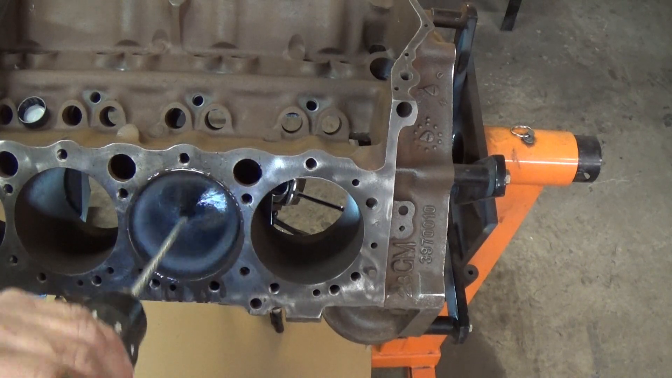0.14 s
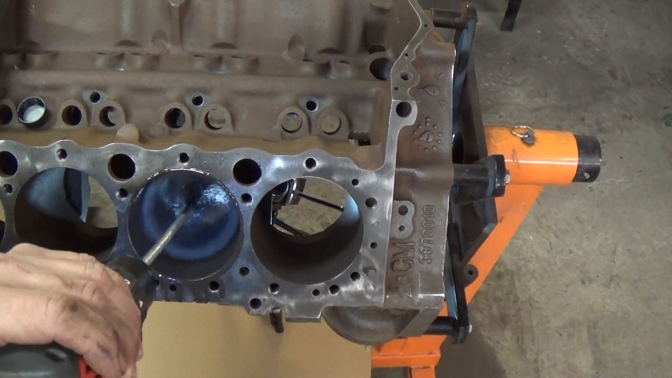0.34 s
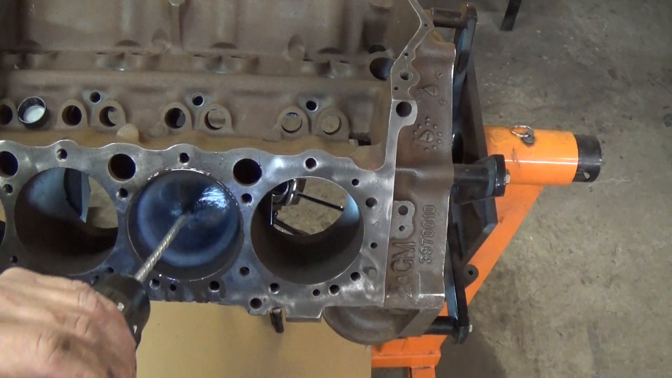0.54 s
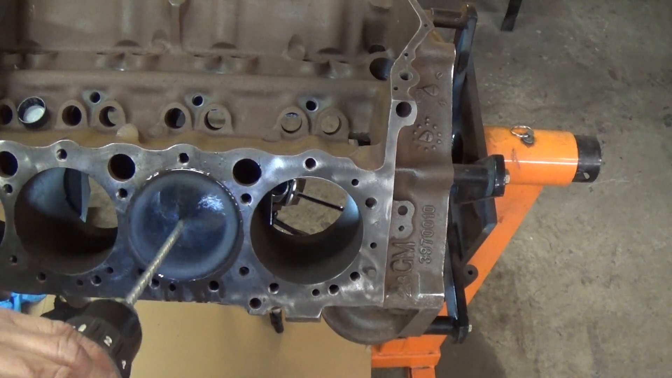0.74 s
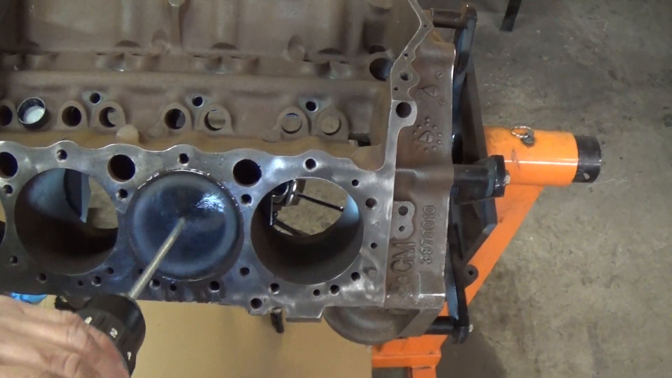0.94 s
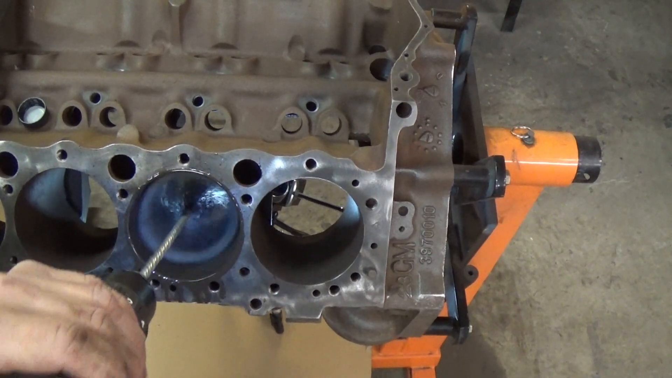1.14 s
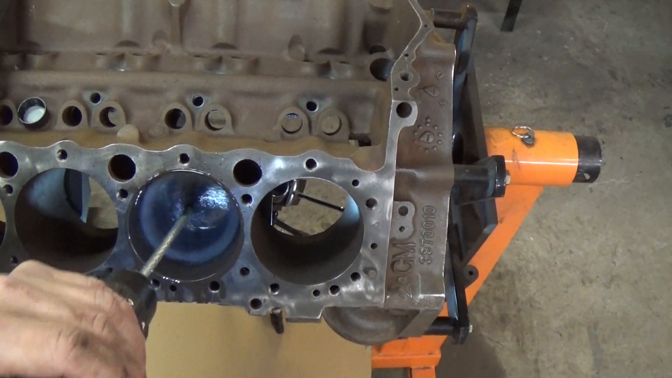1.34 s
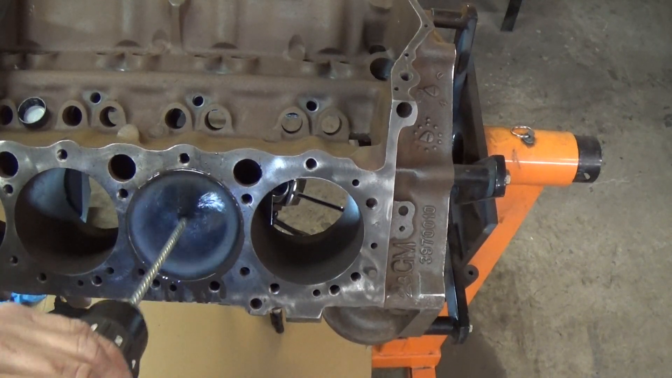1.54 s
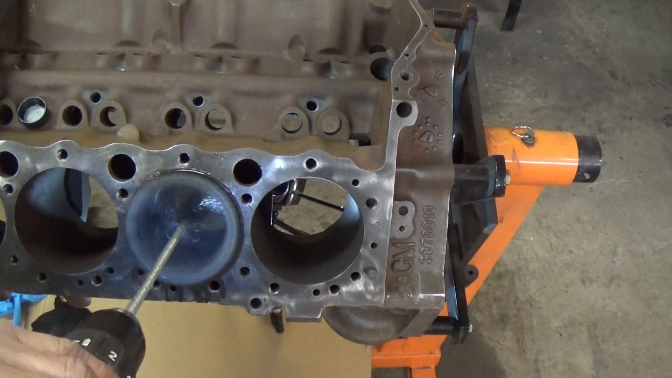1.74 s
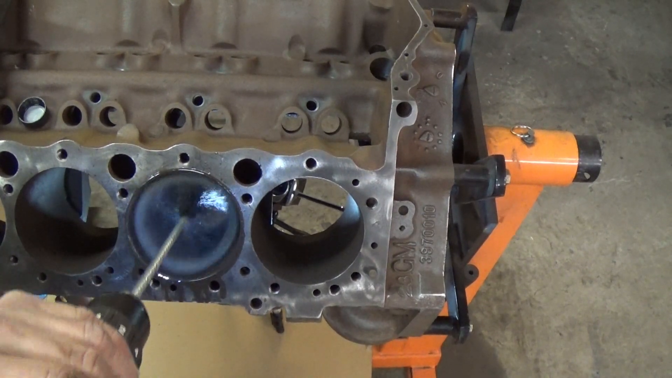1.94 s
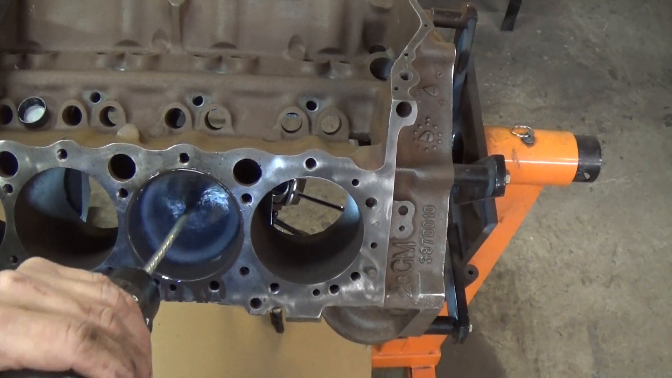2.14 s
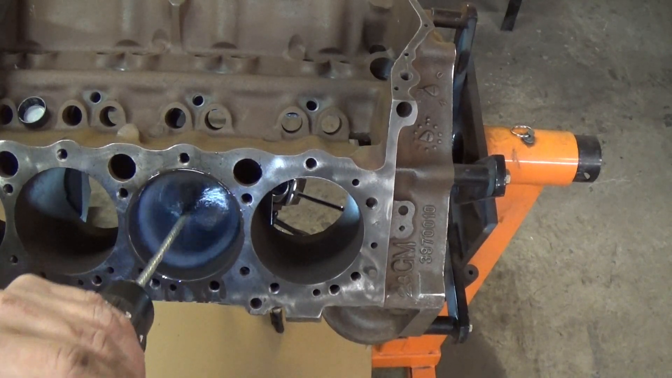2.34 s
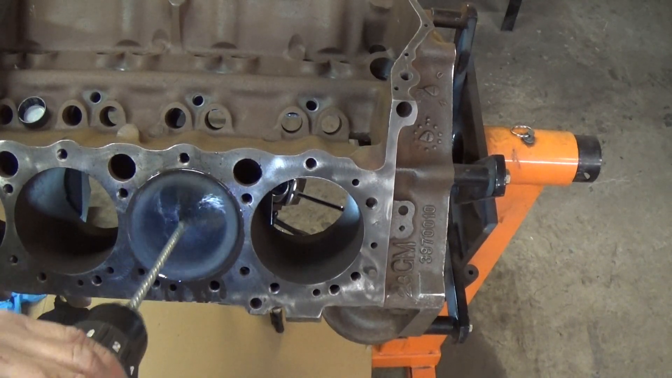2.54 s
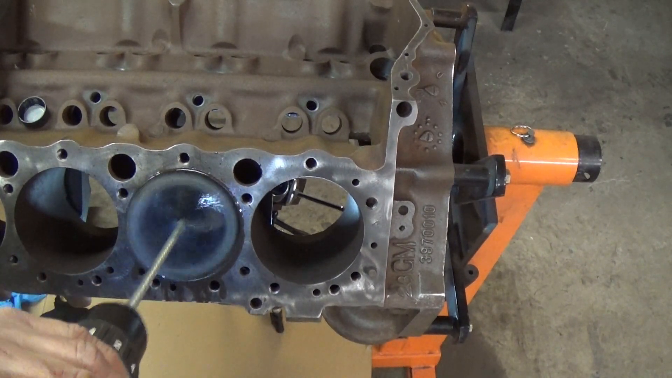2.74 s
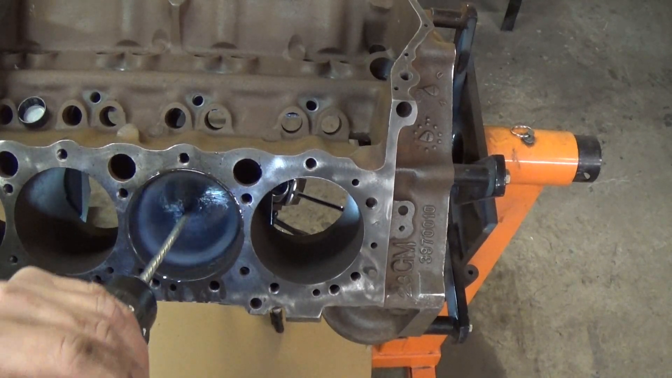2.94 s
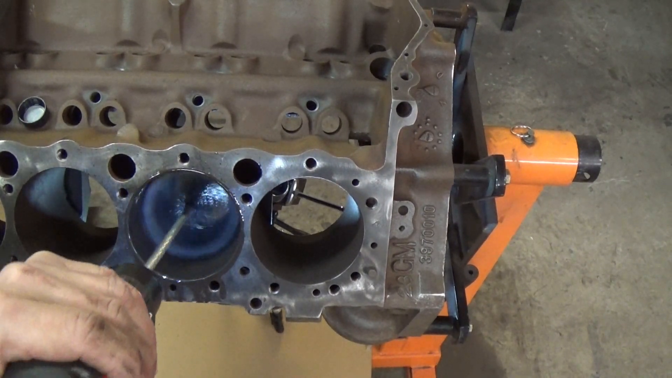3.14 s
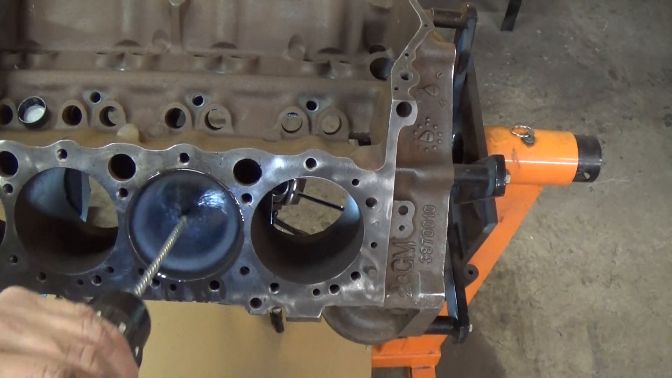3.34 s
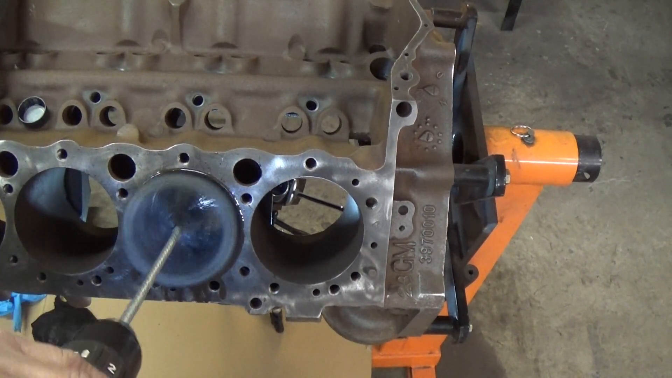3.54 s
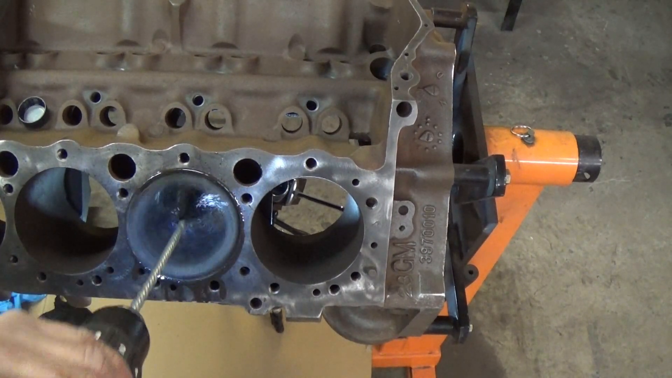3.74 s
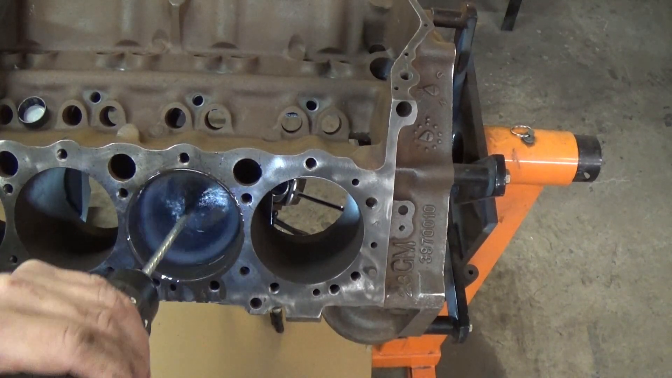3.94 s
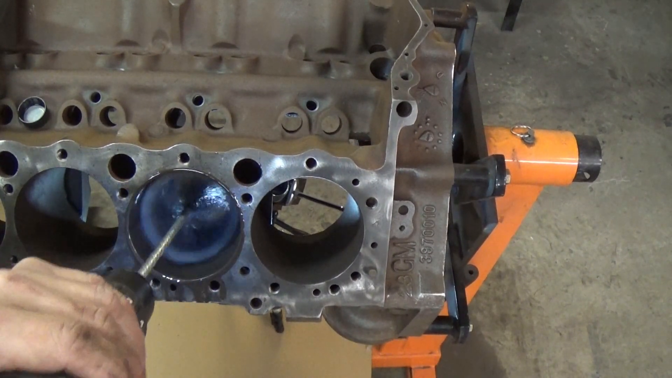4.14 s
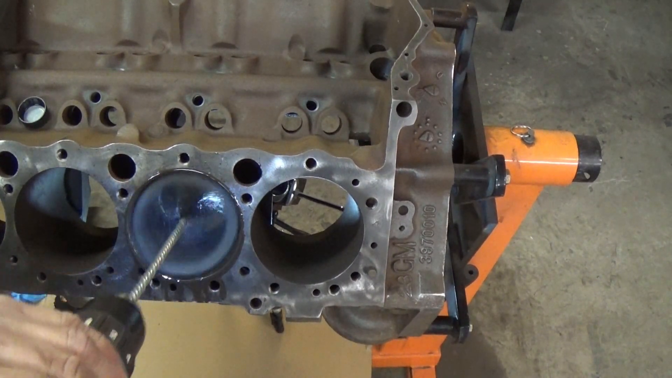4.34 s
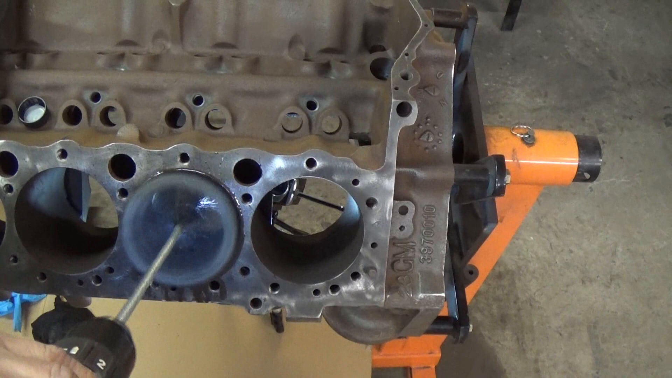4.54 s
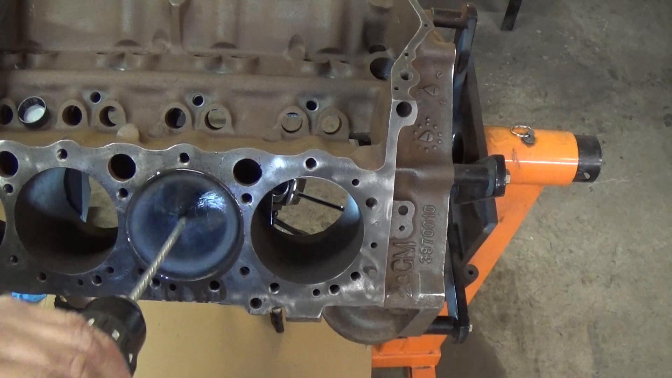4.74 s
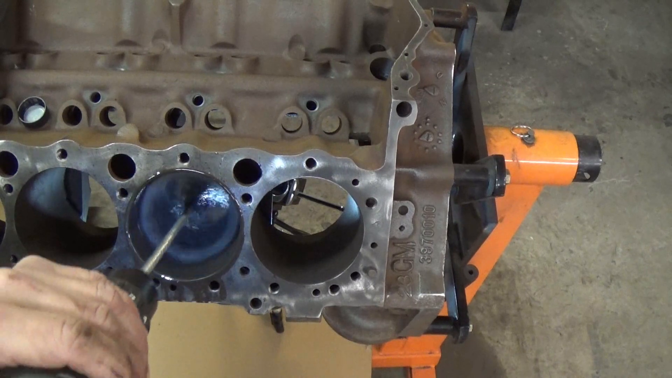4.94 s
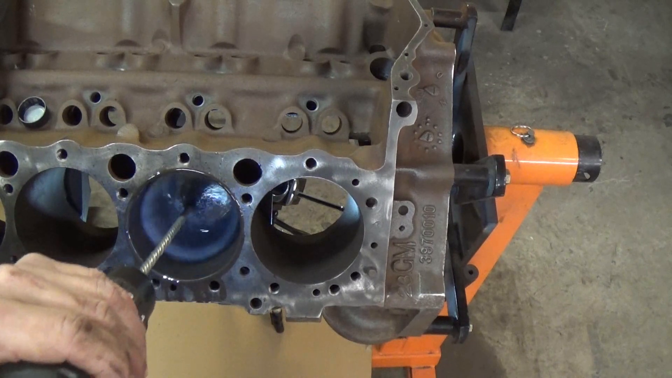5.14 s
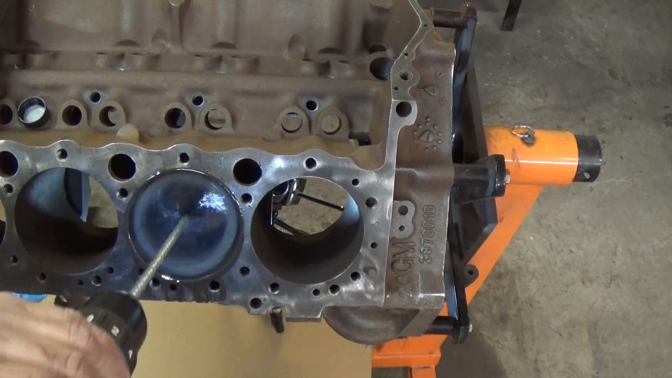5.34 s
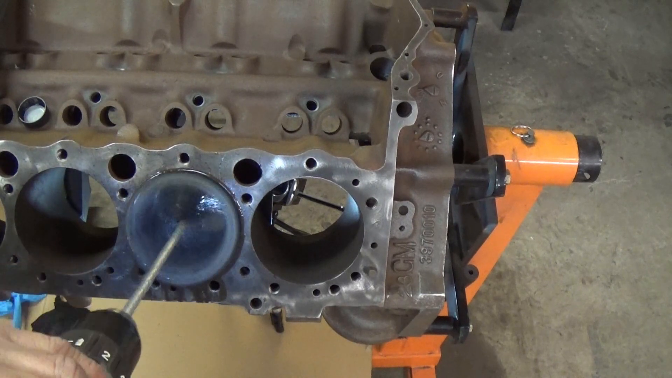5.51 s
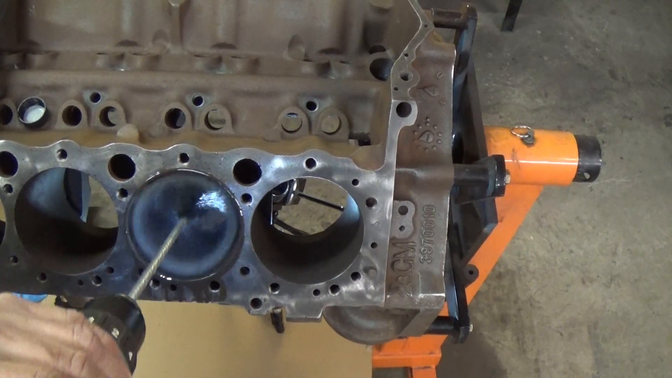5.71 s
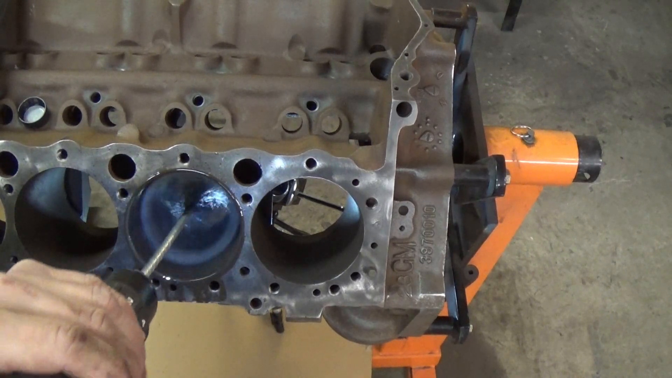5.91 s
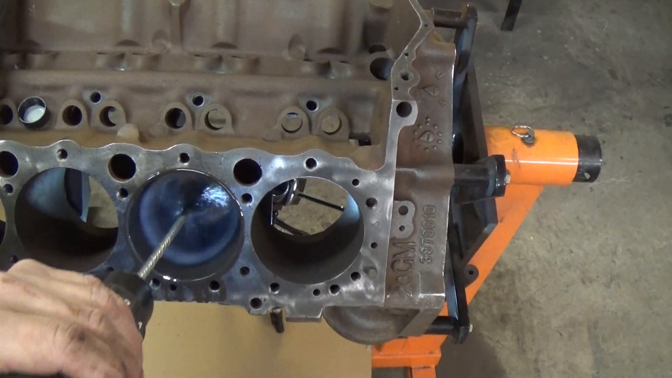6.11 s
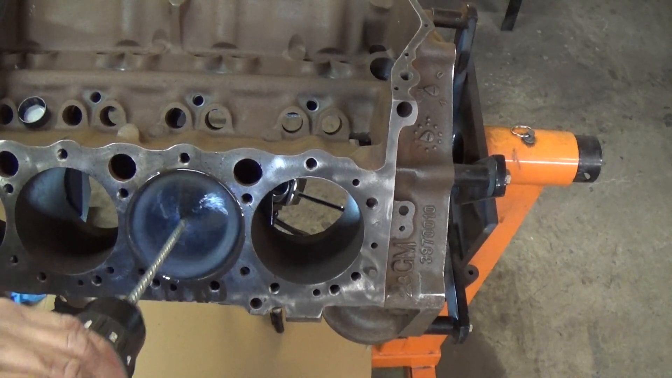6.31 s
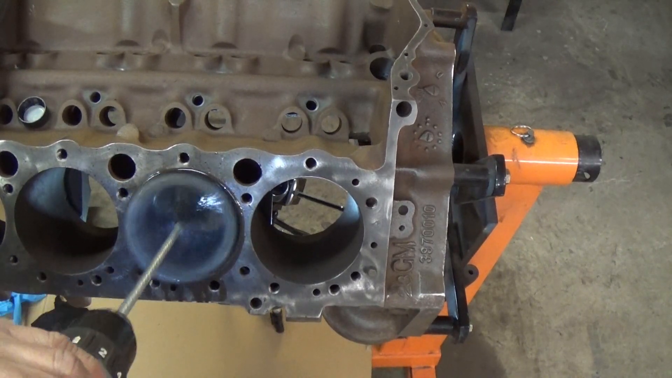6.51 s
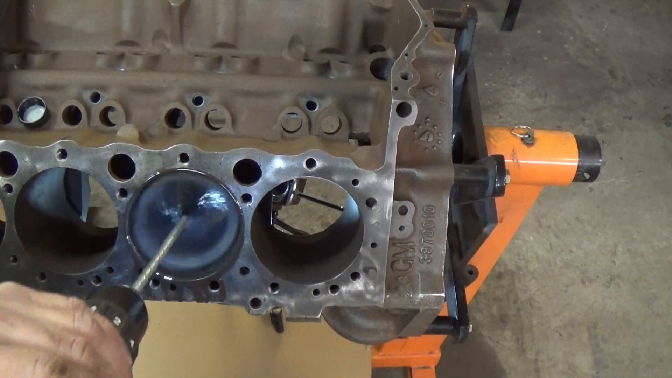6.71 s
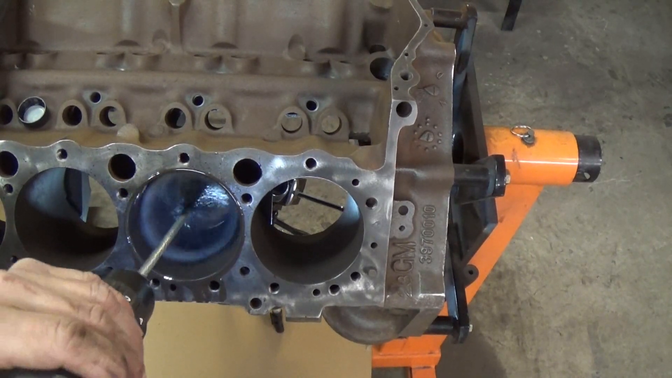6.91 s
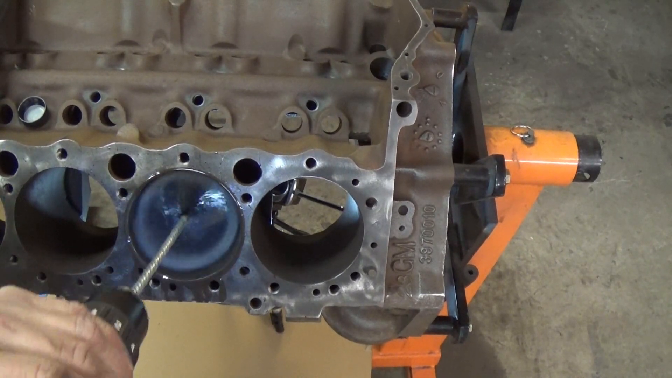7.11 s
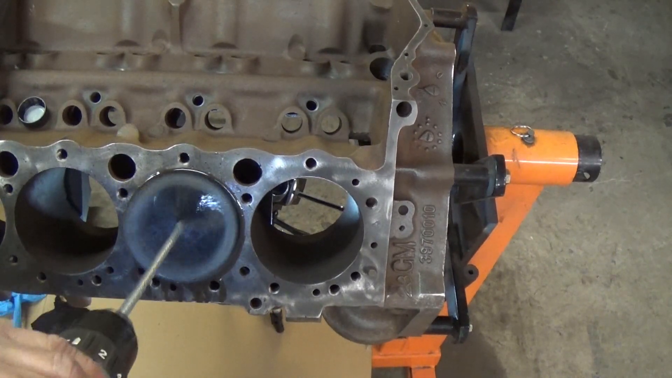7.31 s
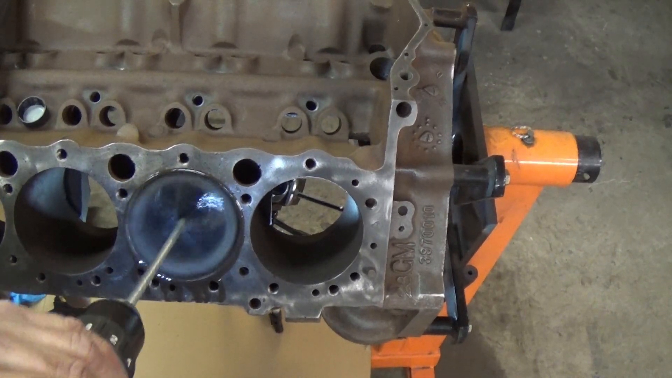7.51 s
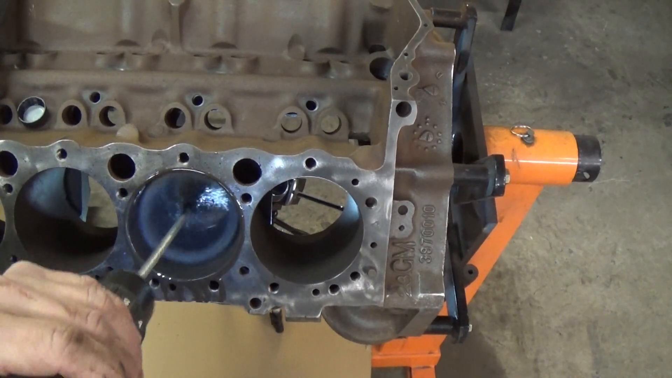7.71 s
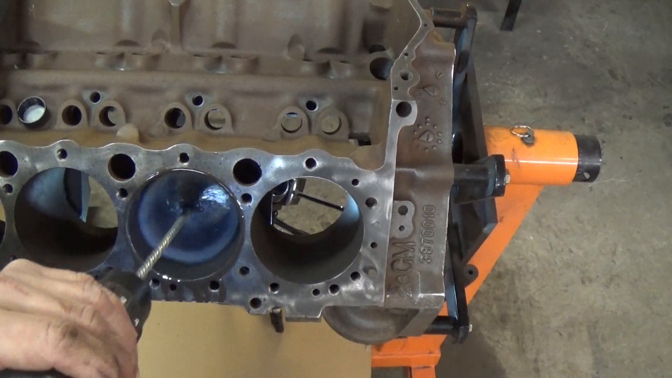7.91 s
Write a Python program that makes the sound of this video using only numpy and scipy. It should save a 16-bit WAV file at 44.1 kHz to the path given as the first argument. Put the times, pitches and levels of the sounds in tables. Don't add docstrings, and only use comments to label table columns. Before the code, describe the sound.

Close, throbbing gear whine and gritty metallic scraping of a drill-driven hone in an engine bore, with dull stand thuds and one short motor sag.

```python
import sys
import numpy as np
from scipy import signal
from scipy.fft import rfft, irfft, next_fast_len
from scipy.io import wavfile
from scipy.ndimage import uniform_filter1d

SR = 44100
rng = np.random.default_rng(int(sys.argv[2]) if len(sys.argv) > 2 else 0)


def level_to_linear(level):
    exponent = np.asarray(level, float) / 20
    return 10 ** exponent


def generate_wav(sig):
    pcm = np.round(np.clip(np.atleast_2d(sig).T, -1, 1) * 32767).astype(np.int16)
    wavfile.write(sys.argv[1], SR, pcm)


N = 351249
T = np.arange(N) / SR
FREE_SPIN = 17.7
CARRIER = 3.75


def unit(x):
    return x / np.sqrt(np.mean(x ** 2))


def coloured(points, envelope=1):
    hz, db = np.transpose(points)
    size = next_fast_len(N)
    bin_hz = np.maximum(np.arange(size // 2 + 1) * SR / size, 1)
    gain = level_to_linear(np.interp(np.log(bin_hz), np.log(hz), db))
    noise = rng.standard_normal(N) * envelope
    return irfft(rfft(noise, size) * unit(gain), size)[:N]


def walk(rate):
    hold = max(int(SR / rate), 2)
    steps = np.repeat(rng.standard_normal(N // hold + 1), hold)
    return unit(uniform_filter1d(uniform_filter1d(steps, hold), hold)[:N])


def impacts(rate, scatter_db, decay_s):
    when, size = rng.random((2, N))
    blows = (when < rate / SR) * level_to_linear(-2 * scatter_db * np.log(size + 1e-9))
    power = signal.filtfilt([1], [1, -np.exp(-2 / (decay_s * SR))], blows)
    return abs(power) / power.mean()


def throb(turn, peak, depth_db, skew):
    angle = 2 * np.pi * (turn - peak)
    return level_to_linear(depth_db * (1 - np.exp(-np.cos(angle + skew * np.cos(angle)))))


def blow(t, db, t60, rise_s):
    return level_to_linear(db - 60 * t / t60) * (1 - np.exp(-t / rise_s))


def ring(when, db, hz, t60, rise_s):
    out = np.zeros(N + SR)
    for s, d, f, decay in np.broadcast(when, db, hz, t60):
        t = T[:int(1.5 * decay * SR)]
        start = int(s * SR)
        out[start:start + len(t)] += blow(t, d, decay, rise_s) * np.sin(2 * np.pi * f * t)
    return out[:N]


def bursts(when, db, t60, rise_s):
    out = np.zeros(N)
    for s, d, decay in np.broadcast(when, db, t60):
        start = int(s * SR)
        t = np.maximum(T - s, 0)[start:int((s + 1.5 * decay) * SR)]
        out[start:start + len(t)] += blow(t, d, decay, rise_s)
    return out


def bumps(rows):
    return sum(height * np.exp(-((T - s) / half_s) ** 2) for s, height, half_s in rows)


# [t/s, spindle speed/turns per s]
SPINDLE_SPEED = [(.075, 0), (.12, 5.7), (.18, 13.7), (.22, 15.95), (.28, 17.25), (.45, 17.86), (1.7, 17.77),
                 (2.15, 17.65), (3.535, 17.66), (3.61, 14.8), (3.7, 13.05), (3.87, 12.15), (3.91, 12.7),
                 (3.95, 14.7), (4.0, 16.85), (4.1, 17.74), (5.9, 17.64), (7.97, 17.6)]
# [t/s, gain/turns per s, half length/s]
PULLS = [(.92, .12, .1), (1.87, .14, .09), (2.81, .27, .09), (4.7, .2, .16), (5.68, .24, .1),
         (6.63, .2, .09), (7.53, .17, .1)]


def spindle():
    eased = bumps(PULLS)
    speed = np.interp(T, *np.transpose(SPINDLE_SPEED)) + eased
    turn = np.cumsum(speed) / SR + .11
    slow = np.clip(1 - speed / FREE_SPIN, 0, 1)
    return speed, turn, eased / eased.max(), slow


# [t/s, whine level/dB]
LEAN = [(0, 5.5), (.6, -2.5), (1.2, 1.4), (2.0, 1.9), (2.9, 2.8), (4.06, -0.5), (4.5, 0.6), (6.0, 0.8),
        (7.96, 0.1)]
# [surge at the start/dB, lift at the mouth/dB, lift when bogged/dB]
BITE = [(9, 1.5, 4), (8, .6, 3), (8, 3.0, -1.5), (4, 2.0, 3.5)]


def bite(mouth, slow):
    mesh_s, mesh_db_per_s = 0.19, 245
    common = np.interp(T, *np.transpose(LEAN)) - mesh_db_per_s * np.maximum(mesh_s - T, 0)
    surge = bumps([(0.167, 1, 0.023)])
    bogged = slow * (T > 1) / slow[SR:].max()
    return [common + a_db * surge + b_db * mouth + c_db * bogged for a_db, b_db, c_db in BITE]


# [order/cycles per spindle turn, level/dB rms]
WHINE_LINES = [
    [(39.6, -64), (43, -59), (45, -47.8), (71.7, -58), (78.75, -60), (96, -60), (108.4, -54), (135, -50)],
    [(15, -77), (30, -65), (60, -60.5), (90, -50), (120, -51)],
    [(131.25, -58), (138.75, -54), (150, -43.5), (165, -47), (168.75, -36.8), (172.5, -45), (195, -50),
     (225, -43.5)],
    [(300, -56), (315, -50), (337.5, -39), (450, -40), (506.25, -48)],
]
# [f/Hz, width/Hz, boost/dB]
HOUSING = [(530, 140, 5), (1090, 170, 11), (2080, 250, 5), (2500, 300, 4), (3800, 400, 7), (4300, 900, -6),
           (5400, 420, 12)]
FLUTTER_DB = [1.5, 3.3, 2.5, 2.3]


def whine(speed, turn, swells_db):
    labour, chop_db = 2.0, 7
    strain = .0001
    slow = np.clip(1 - speed / FREE_SPIN, 0, .3)
    chop = level_to_linear(chop_db * slow * np.sin(2 * np.pi * CARRIER * turn))
    hz = np.arange(0, 10000, 10)
    housing_db = sum(b / (1 + ((hz - f) / w * 2) ** 2) for f, w, b in HOUSING)
    load_db = .045 * np.maximum(uniform_filter1d(np.gradient(speed) * SR, size=900), 0)
    shake = .0009 * (1 + labour * slow) * walk(45) + .00015 * walk(160)
    shake = shake + .0008 * np.sin(2 * np.pi * turn) + strain * load_db * walk(220)
    out = 0
    for lines, swell_db, flutter_db in zip(WHINE_LINES, swells_db, FLUTTER_DB):
        for order, db in lines:
            boost_db = np.interp(order * speed, hz, housing_db)
            motor_db = load_db * (130 < order < 300)
            gain = level_to_linear(db + boost_db + swell_db + motor_db + flutter_db * walk(48))
            phase = order * (turn + shake) + rng.random()
            out = out + gain * np.sqrt(2) * np.sin(2 * np.pi * phase)
    return out * chop * throb(turn, 0.2, 2.45, skew=-0.7) * level_to_linear(1.66)


def contact_db():
    start_s, start_db_per_s = 0.11, 704
    snag_s, snag_half_s, snag_db = 1.664, .006, 7
    x = (T - snag_s) / snag_half_s
    return -start_db_per_s * np.maximum(start_s - T, 0) - snag_db * x * np.exp(-(x - .6) ** 2 / 2)


# [f/Hz, level/dB per Hz]
RATTLE_SPECTRUM = [(25, -56), (60, -53), (130, -44), (300, -28.5), (560, -22.5), (700, -20), (1060, -11.5),
                   (1450, -14.5), (2200, -6), (3000, -3.5), (3600, -4), (6000, -3.5), (9000, -9),
                   (16000, -67)]


def rattle(turn, mouth, slow, build_db):
    carrier = 2 * np.pi * CARRIER * turn
    strain_db = np.where(T < 1, 20, 6) - 0.5 * np.sin(carrier)
    level_db = -28 + build_db + strain_db * np.minimum(slow, 0.37) + 2 * mouth
    beat = level_to_linear(1.0 * np.sin(carrier) + 0.45 * np.sin(2 * carrier) + 0.33 * np.sin(4 * carrier))
    bind = throb(turn, .21, 3.3 + 1.1 * walk(9), skew=-.9) * level_to_linear(.8 * walk(25))
    knocks = np.sqrt(0.64 + impacts(400, 0.97, 0.0019))
    return coloured(RATTLE_SPECTRUM, unit(knocks * beat * bind) * level_to_linear(level_db + 2.5))


# [t/s, lift of the bore ring/dB, half length/s]
PLUNGES = [(.42, 7.5, 0.28), (1.33, 9.5, 0.057), (2.3, 9, .16), (3.2, 9, .13), (4.16, 9.5, 0.13),
           (5.17, 9, 0.14), (6.14, 7.5, 0.12), (7.06, 5, 0.099), (7.93, 7.5, 0.087)]
# [f/Hz, width/Hz, level/dB]
BORE_BANDS = [(3950, 220, -2), (4540, 110, -1), (4250, 1500, 0)]
# [f/Hz, level/dB per Hz]
TICK_SPECTRUM = [(2000, -53), (5000, -10.5), (7000, -3), (8200, 2), (9500, 2.5), (11500, 1), (13000, -7),
                 (14500, -13), (16000, -17)]
# [f/Hz, level/dB per Hz]
RUB_SPECTRUM = [(2000, -43.5), (5000, -6.5), (7000, -3), (8200, 0.5), (9500, 3), (11500, -1.5), (13000, -9),
                (14500, -23), (16000, -26)]


def hone(speed, turn, mouth, slow, build_db):
    deep_db = bumps(PLUNGES)
    dragged = uniform_filter1d(slow, size=SR // 12, origin=SR // 25)
    lurch_db = dragged * (-11.5 + 15 * (T > 1) * np.cos(2 * np.pi * (turn - .7)))
    scrape_db = -21.5 + build_db + 0.13 * deep_db - 0.5 * mouth + lurch_db
    ring_db = -35 + build_db + deep_db + 20 * np.log10(speed / speed.max() + 1e-3)
    blows = impacts(330, 1.2, .0005)
    tick_gain = throb(turn, 0.57, 0.62, skew=0.85) * level_to_linear(scrape_db - 1.5 + 0.53 * walk(22))
    ticks = coloured(TICK_SPECTRUM, np.sqrt(blows) * tick_gain)
    rub_gain = throb(turn, 0.58, 1.7, skew=0.091) * level_to_linear(scrape_db - 1.5 + 0.66 * walk(22))
    rub = coloured(RUB_SPECTRUM, rub_gain)
    source = rng.standard_normal(N) * np.sqrt(2.7 + blows)
    bore = 0
    for f, width, db in BORE_BANDS:
        bore = bore + level_to_linear(db) * unit(signal.lfilter(*signal.iirpeak(f, f / width, SR), source))
    bore = unit(bore * throb(turn, 0.11, 4.5, skew=-1.5) * level_to_linear(1.2 * walk(16)))
    return ticks + rub + bore * level_to_linear(ring_db + 2.5)


# [t/s, peak level/dB, f/Hz]
JOLTS = [(.647, -48, 164), (.866, -40, 217), (.917, -38, 169), (.988, -37, 154), (1.045, -40, 160),
         (1.674, -41, 234), (1.765, -35, 169), (1.885, -32, 158), (1.945, -51, 167), (1.993, -41, 153),
         (2.853, -39, 169), (3.532, -42, 229), (5.491, -41, 218), (5.553, -39, 228), (5.66, -33.5, 164),
         (5.722, -31, 170), (5.756, -58, 167), (6.455, -40, 220), (6.503, -42, 170), (6.628, -33.5, 161),
         (6.683, -30.5, 217), (7.308, -39, 226), (7.36, -37, 218), (7.416, -37, 159), (7.476, -32, 221),
         (7.525, -30, 157), (7.573, -30, 158), (7.706, -45, 231)]
# [f/Hz, level/dB per Hz]
THUD_SPECTRUM = [(25, -33), (60, -12), (110, -11), (160, 0), (220, -1), (330, -5), (600, -15), (2000, -42)]


def stand(turn):
    laps = T[1:][np.diff(np.floor(turn)) > 0]
    chance = rng.standard_normal((len(laps), 2)).T
    nudges = [laps, -59.5 - 0.5 * chance[0], 271 + 34 * chance[1]]  # s, dB, Hz
    when, db, hz = np.hstack([np.transpose(JOLTS), nudges])
    rumble = coloured(THUD_SPECTRUM, bursts(when, db - 4.5, 0.18, rise_s=0.015))
    return ring(when, db + 3.5, hz, 0.074, rise_s=0.0082) + rumble


# [t/s, peak level/dB, f/Hz, t60/s]
SLACK_TICKS = [
    (.0075, -17, 317, 0.014),
    (.0075, -25, 2300, .02),
    (.017, -32, 1500, .02),
    (0.0978, -12.5, 1110, 0.021),
    (0.0967, -11, 1730, 0.023),
    (0.0983, -26, 538, 0.062),
]


def slack():
    return ring(*np.transpose(SLACK_TICKS), rise_s=0.00054)


# [t/s, peak level/dB, t60/s]
TRIGGER = [
    (.0318, -23, 0.011),
    (.0385, -38, .04),
    (.0408, -39, 0.018),
    (.047, -47, 0.073),
]
# [f/Hz, level/dB per Hz]
SNAP_SPECTRUM = [(500, -16), (3000, -7), (5500, -4), (7500, -7), (8600, 3), (10500, -6), (13000, -14),
                 (16000, -20)]


def trigger():
    return coloured(SNAP_SPECTRUM, bursts(*np.transpose(TRIGGER), rise_s=.0002))


# [f/Hz, level/dB per Hz]
AIR_SPECTRUM = [(30, -28), (150, 9), (300, 11), (800, 4), (2600, 3), (3200, -14), (10000, -21),
                (16000, -36)]


def garage_air():
    return coloured(AIR_SPECTRUM) * (level_to_linear(-36 - 140 * T) + level_to_linear(-68))


def reflections(near):
    t60_s = .26
    t = T[:SR // 2]
    tails = rng.standard_normal((2, len(t))) * level_to_linear(-60 * t / t60_s) * (t > .002)
    band = signal.butter(3, [260, 12000], "bandpass", fs=SR, output="sos")
    tails = signal.sosfilt(band, tails)
    tails = tails / np.sqrt(np.sum(tails ** 2, axis=1, keepdims=True))
    return level_to_linear(-16.5) * signal.fftconvolve(near[None], tails, axes=1)[:, :N]


def left_lean(near):
    left_db, hum_hz, hum_db = 1.14, 1140, -16.5
    lean = signal.lfilter(*signal.butter(1, 250, "highpass", fs=SR), near) * (level_to_linear(left_db / 2) - 1)
    lean = lean + level_to_linear(hum_db) * signal.lfilter(*signal.iirpeak(hum_hz, 3.5, SR), near)
    return np.array([lean, -lean])


def scene():
    speed, turn, mouth, slow = spindle()
    build_db = contact_db()
    near = whine(speed, turn, bite(mouth, slow))
    near = near + rattle(turn, mouth, slow, build_db)
    near = near + hone(speed, turn, mouth, slow, build_db)
    near = near + stand(turn) + slack() + trigger() + garage_air()
    return near + left_lean(near) + reflections(near)


def top_cut(x):
    return signal.sosfilt(signal.butter(12, 15730, fs=SR, output="sos"), x)


def record(dry):
    rounded = np.tanh(1.45 * dry) / 1.45
    lowpass = signal.ellip(8, .2, 60, 15800, fs=SR, output="sos")
    return top_cut(signal.sosfilt(lowpass, rounded))


dry = scene()
out = record(dry)
generate_wav(out)
```